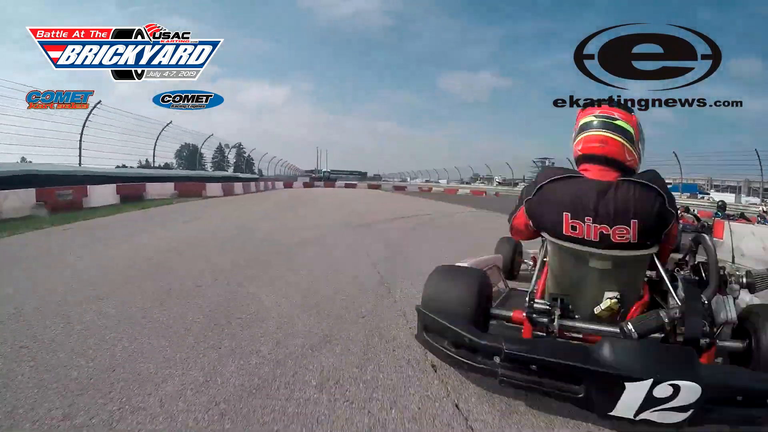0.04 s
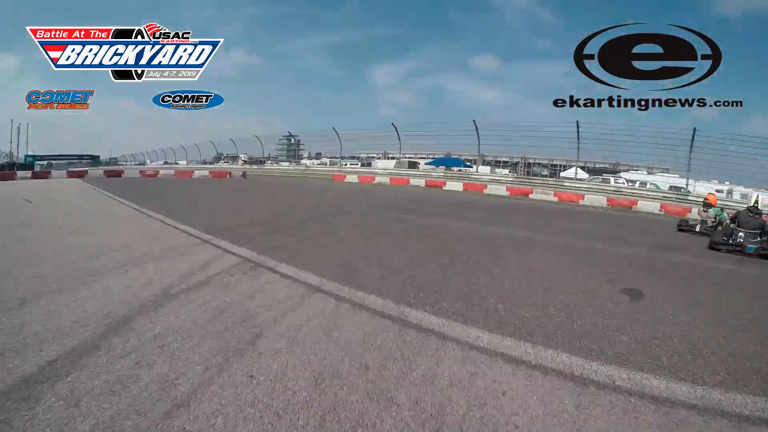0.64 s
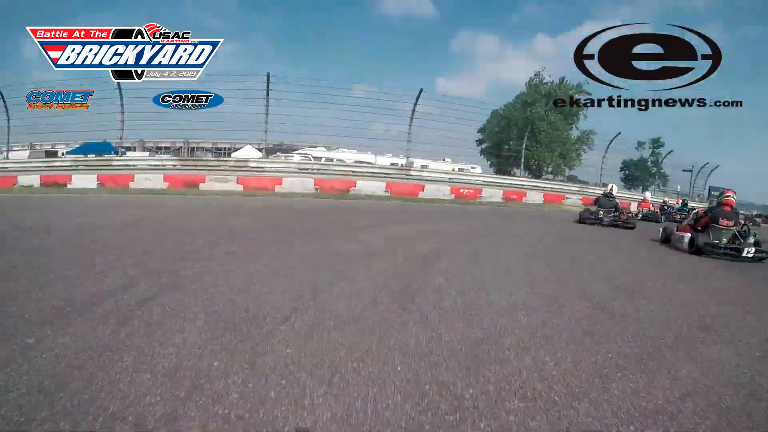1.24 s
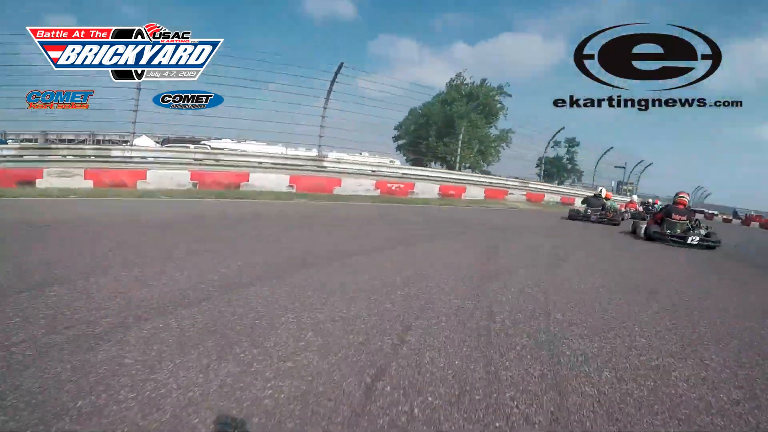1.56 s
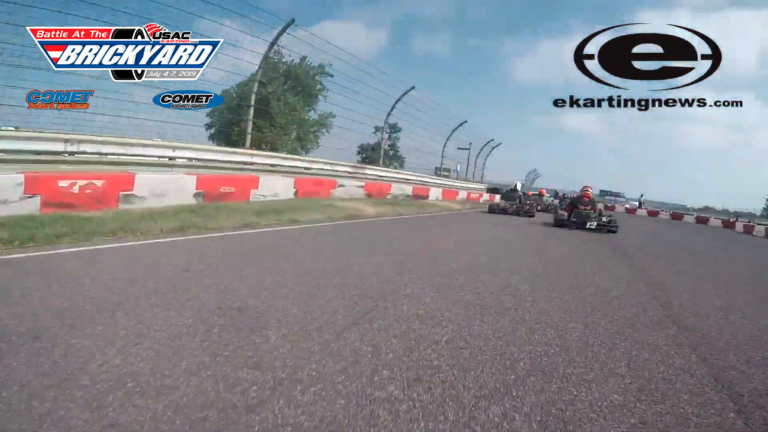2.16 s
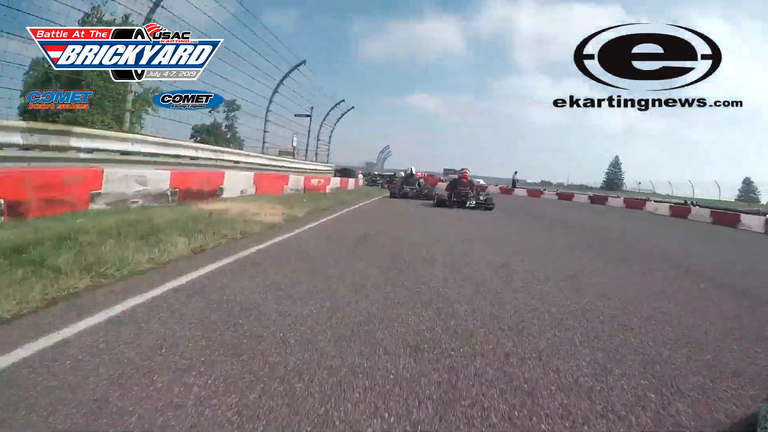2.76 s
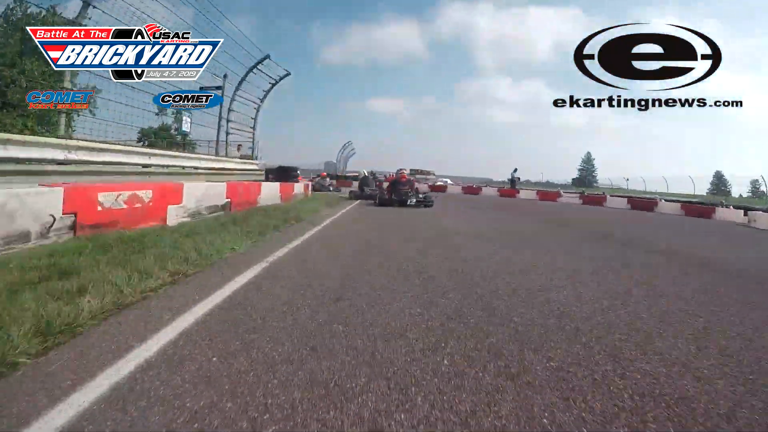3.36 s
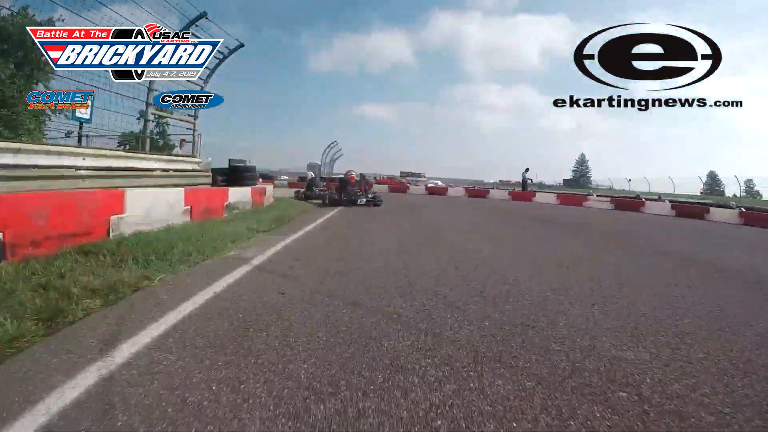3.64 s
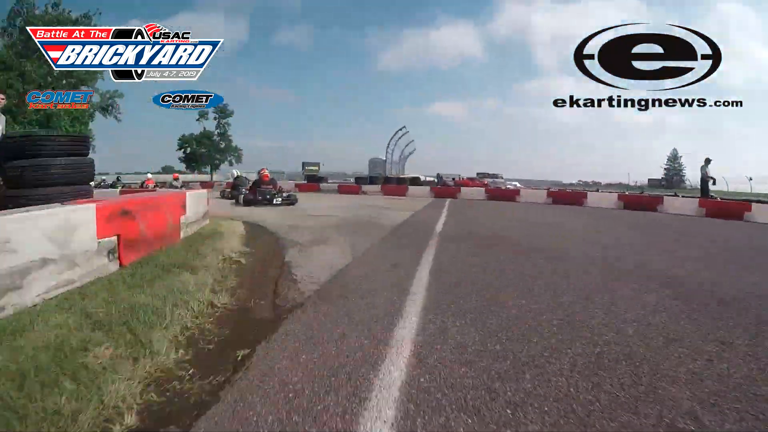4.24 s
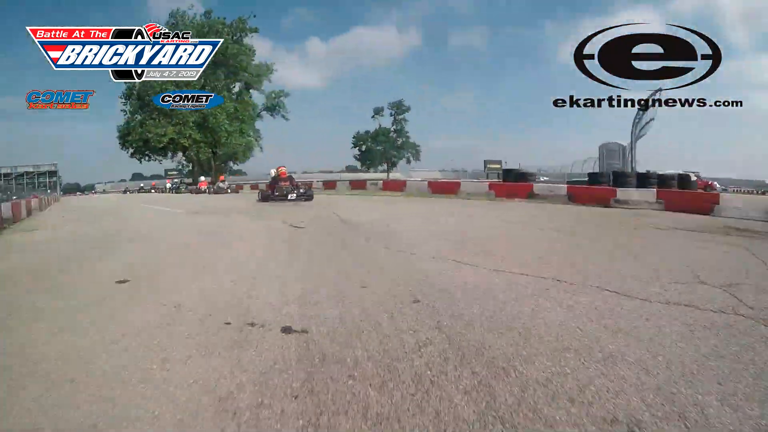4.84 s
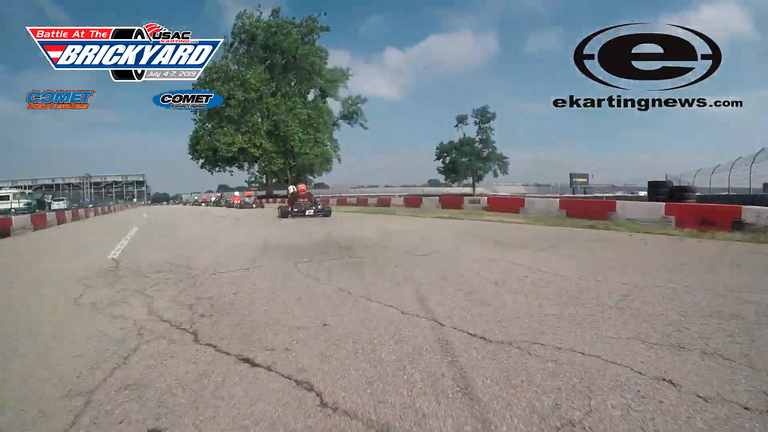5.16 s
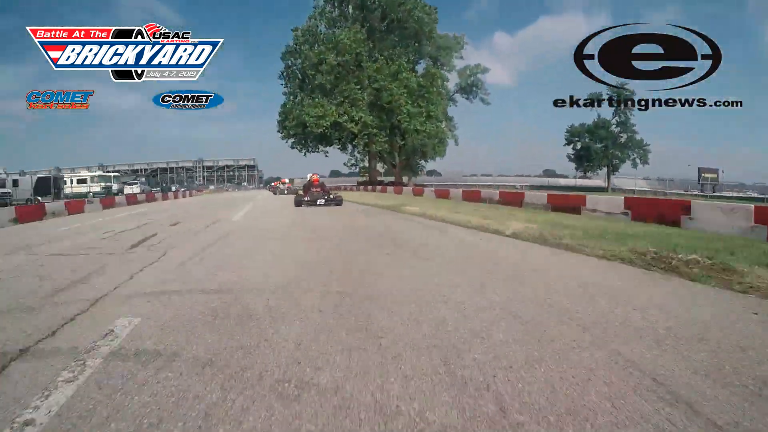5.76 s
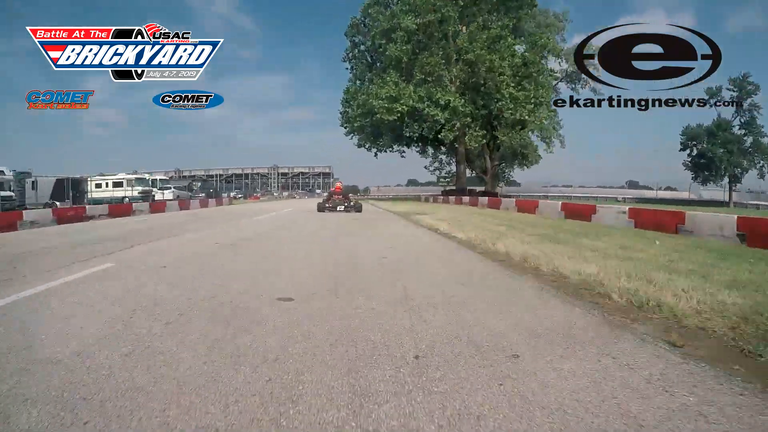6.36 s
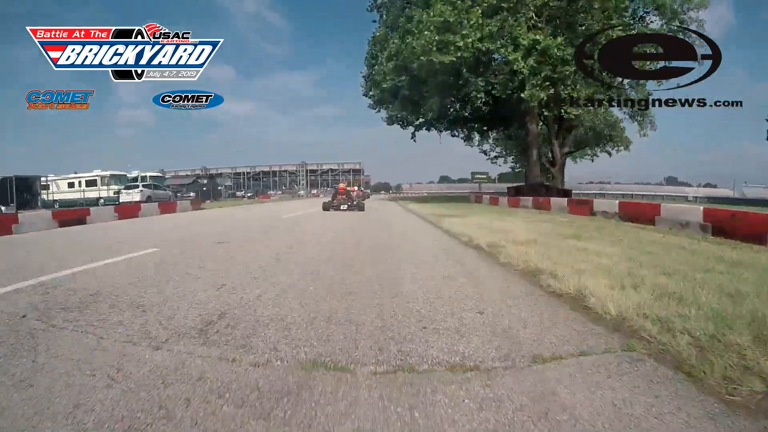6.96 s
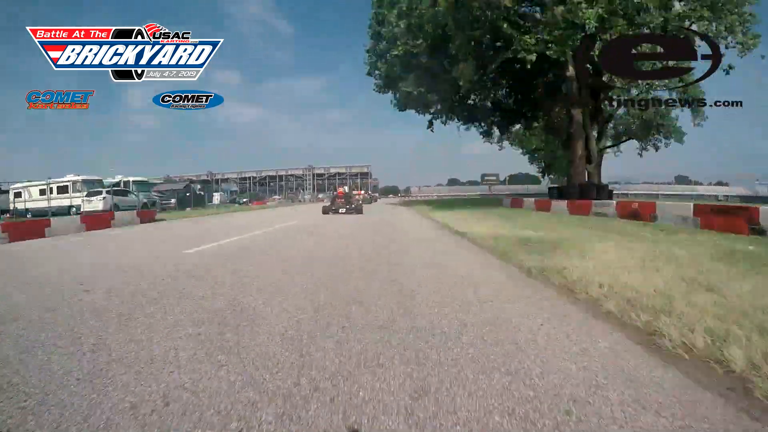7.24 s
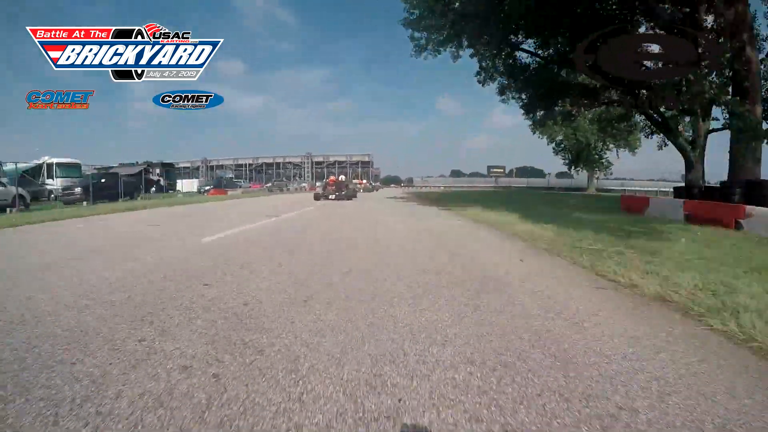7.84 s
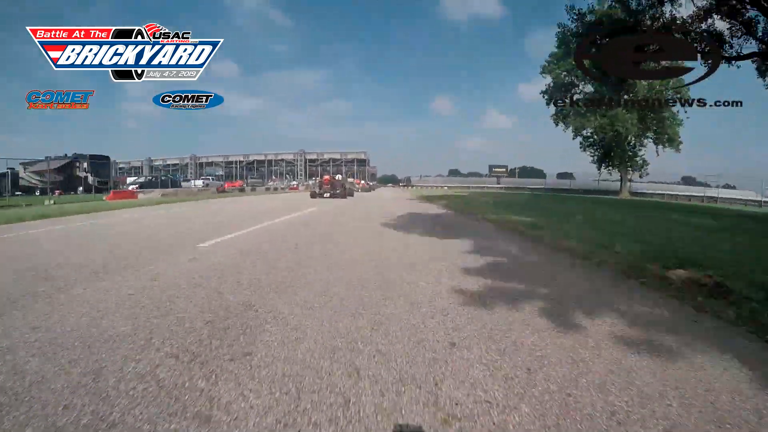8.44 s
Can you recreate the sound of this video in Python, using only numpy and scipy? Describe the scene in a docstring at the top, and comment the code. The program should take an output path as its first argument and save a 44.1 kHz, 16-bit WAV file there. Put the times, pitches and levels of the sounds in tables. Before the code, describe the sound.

The close, hollow rattle of a camera housing runs throughout as a go-kart races over asphalt. Beneath it the small engine dips, catches and drones with a growl, while the exhausts of two nearby karts puff faintly in the first half. A sharp double clatter marks a joint in the surface, after which the tyre roar turns duller. The revs then rise steadily amid knocks, dull thuds and tiny stone ticks.

```python
"""A four-stroke racing kart engine, heard from inside a small camera housing bolted to the kart's nose.
It coasts into a corner, picks up on its slipping clutch, then pulls away, its firings making the frame
drone and growl. Engine shake and asphalt rattle the housing over a bed of tyre roar and air hiss.
Bumps thud, grit ticks, both axles bang over a seam, and the exhausts of two nearby karts puff faintly."""
import sys
import numpy as np
from scipy import signal
from scipy.fft import rfft, irfft, next_fast_len
from scipy.io import wavfile
from scipy.ndimage import uniform_filter1d

SR = 44100
rng = np.random.default_rng(int(sys.argv[2]) if len(sys.argv) > 2 else 0)


def file_out(sig):
    """Save sig as 16-bit WAV at sys.argv[1]."""
    # one column per channel
    cols = np.atleast_2d(sig).T
    # limit, then scale
    lim = np.clip(cols, -1, 1)
    pcm = np.round(lim * 32767).astype(np.int16)
    wavfile.write(sys.argv[1], SR, pcm)


N = 384111


def from_db(db):
    return 10 ** (np.asarray(db) / 20)


def unit_rms(x):
    return x / np.sqrt(np.mean(x ** 2) + 1e-20)


def automation(rows):
    """One curve per column after the time column, with a value at every sample."""
    times, *columns = np.transpose(rows)
    return [np.interp(np.arange(N) / SR, times, column) for column in columns]


def equalise(x, spectrum):
    """Shapes a sound with an EQ curve that rolls off steeply beyond its ends."""
    size = next_fast_len(N + 8192)
    octave = np.log2(np.maximum(np.arange(size // 2 + 1) * SR / size, 1))
    hz, db = np.transpose(spectrum)
    octaves_outside = np.maximum(np.log2(hz[0]) - octave, 0) + np.maximum(octave - np.log2(hz[-1]), 0)
    gain = from_db(np.interp(octave, np.log2(hz), db) - 16.7 * octaves_outside)
    return irfft(rfft(x, size) * gain, size)[:N]


def drift(rate_hz):
    """Smooth random modulation at unit RMS."""
    pole = np.exp(-40 * np.pi * rate_hz / SR)   # runs at one step per 20 samples
    slow = signal.lfilter([1], [1, -2 * pole, pole * pole], rng.standard_normal(N // 20 + 3002))[3000:]
    return np.interp(np.arange(N) / 20, np.arange(len(slow)), unit_rms(slow))


def triggers(hits, gain_db=0):
    """A one-sample kick for each listed hit."""
    kicks = np.zeros(N)
    for at_s, db in hits:
        kicks[int(at_s * SR)] = from_db(db + gain_db)
    return kicks


def die_away(kicks, decay_s):
    """Gives each kick an exponential tail."""
    return signal.lfilter([1], [1, -np.exp(-1 / (decay_s * SR))], kicks + 1e-18)


def levelled(x):
    """Rides the gain to unit level over every eighth of a second; faster detail stays."""
    return x / np.sqrt(np.abs(uniform_filter1d(x * x, SR // 8)) + 1e-12)


# Low-end shake by engine speed:
# (firing rate [Hz], firing order [dB], crank order [dB], third order [dB])
SHAKE_LEVELS = [(22.3, -45, -25, -57), (23.4, -30.5, -26.5, -40.5), (25.4, -29, -43.5, -48.5),
                (27.5, -28.5, -38.5, -42), (28.87, -31, -38.5, -57), (29.1, -29, -34.5, -49),
                (31.2, -31, -31.5, -47)]
def engine_shake(cycle, firing_hz):
    """Firing and crank imbalance shake the chassis; the crank turns twice per firing."""
    speeds, *levels = np.transpose(sorted(SHAKE_LEVELS))
    firing_db, crank_db, third_db = [np.interp(firing_hz, speeds, db) for db in levels]
    phase = 2 * np.pi * cycle
    firing = from_db(firing_db - 1.5 * drift(1)) * np.cos(phase)
    crank = from_db(crank_db + 1.5 * drift(1.4)) * np.sin(2 * phase)
    return firing + crank + from_db(third_db) * np.cos(3 * phase)


def engine_orders(cycle, firing_hz, orders, spectrum, tilt_db=0):
    """Harmonics of the firing rate swell as they sweep through resonances, wavering in level and timing."""
    wander_cycles = 0.0085
    out = 0
    for order in orders:
        db = np.interp(order * firing_hz, *np.transpose(spectrum))
        db += tilt_db * np.log2(order / np.mean(orders))
        turns = order * (cycle + wander_cycles * drift(7.7)) + rng.random()
        out = out + from_db(db + 2.4 * drift(7)) * np.cos(2 * np.pi * turns)
    return unit_rms(out)


# Drone fader, loudest on the way out of the corner: (time [s], level [dB], tilt [dB/octave])
DRONE_RIDE = [(0, -52, 6), (.2, -44.5, 3), (.5, -50, -1), (.75, -43, -4), (1.5, -46.5, 7), (2.25, -42.5, 5),
              (3.6, -46, 23), (4.6, -46, -10), (5.35, -39, -4), (6.1, -37, -4), (6.85, -39, -4),
              (7.15, -43, 9), (7.65, -40.5, 5), (8.1, -46, 0), (8.71, -41.5, -5)]
# Body resonance of the frame: (frequency [Hz], gain [dB])
DRONE_EQ = [(95, -28), (115, -8), (130, -7), (153, 2.5), (168, 3), (185, 1), (208, -10.5), (240, -25)]
def frame_drone(cycle, firing_hz, waver_db):
    """The frame hums along with engine orders 4 to 8."""
    level_db, tilt_db = automation(DRONE_RIDE)
    return from_db(level_db + waver_db) * engine_orders(cycle, firing_hz, range(4, 9), DRONE_EQ, tilt_db)


# Growl fader: (time [s], level [dB])
GROWL_RIDE = [(0, -54), (.62, -58), (.72, -48), (2.9, -48), (3.6, -53), (4.5, -55.5), (6, -54.5),
              (7.5, -51), (8.71, -49.5)]
# Low-mid colour of the growl: (frequency [Hz], gain [dB])
GROWL_EQ = [(235, -2.5), (270, -8), (295, -0.5), (325, -1.5), (350, -0.5), (380, -10), (430, -8)]
def frame_growl(cycle, firing_hz):
    """Engine orders 9 to 14 make the frame growl."""
    level_db, = automation(GROWL_RIDE)
    return from_db(level_db) * engine_orders(cycle, firing_hz, range(9, 15), GROWL_EQ)


# Coarse asphalt: (centre [s], half length [s], tyre roar boost [dB], heave boost [dB])
ROUGH_PATCHES = [(.22, 0.2, 3, 0), (1.276, .1, 4, 4), (2.785, 0.4, 3.5, 9), (3.814, 0.074, 4.5, 1),
                 (5.508, 0.058, 3.5, 8), (6.164, 0.022, 9.5, 0), (6.372, 0.036, 5, 0),
                 (7.175, 0.13, 2.5, 9.5), (8.6, 0.17, 3, -2)]
def rough_patches():
    """Each coarse patch gives a smooth swell: boost curves in dB for tyre roar and heave."""
    t = np.arange(N) / SR
    return sum(np.outer(boosts_db, np.exp(-((t - centre_s) / half_s) ** 2))
               for centre_s, half_s, *boosts_db in ROUGH_PATCHES)


# Heave fader: (time [s], level [dB])
HEAVE_RIDE = [(.55, -36), (1.0, -36), (2.0, -39.5), (2.4, -42), (3.7, -41.5), (4.35, -34.5), (5.1, -40),
              (6.2, -37), (6.85, -33), (7.45, -46.5), (8.1, -35), (8.71, -37)]
# Sub-bass weight of the heave: (frequency [Hz], gain [dB])
HEAVE_EQ = [(14, -10), (22, -2.5), (38, 8), (60, -8), (90, -16.5), (130, -20.5)]
def chassis_heave(boost_db):
    """The chassis heaves on the asphalt with a deep rumble."""
    level_db, = automation(HEAVE_RIDE)
    return from_db(level_db + boost_db) * levelled(equalise(rng.standard_normal(N), HEAVE_EQ))


# Hollow colour of the frame: (frequency [Hz], gain [dB])
BOOM_EQ = [(90, -29), (125, -16), (150, -17.5), (172, -2.5), (200, 1), (235, -18.5), (290, -27.5)]
def road_boom(waver_db):
    """Road noise booms in the frame, riding 6 dB under the drone."""
    drone_db, _ = automation(DRONE_RIDE)
    return from_db(drone_db + waver_db - 6) * levelled(equalise(rng.standard_normal(N), BOOM_EQ))


# Tyre tone before and after the seam: (frequency [Hz], gain [dB])
SMOOTH_TRACK_EQ = [(200, -3), (260, -2), (340, 0.5), (410, -6.5), (500, -10.5), (680, -6.5), (1000, -3),
                   (2000, -9)]
WORN_TRACK_EQ = [(200, -12.5), (260, 2.5), (340, -2.5), (410, -7.5), (500, -9), (680, -6.5), (1000, -7),
                 (2000, -21)]
def tyre_roar(rattle_swing_db, boost_db):
    """The tyres roar on the asphalt, turning duller on the worn stretch past the seam."""
    worn_from_s = 4.42
    tread = rng.standard_normal(N) * from_db(3.66 * drift(32))
    smooth = levelled(equalise(tread, SMOOTH_TRACK_EQ))
    worn = levelled(equalise(tread, WORN_TRACK_EQ))
    surface = np.where(np.arange(N) / SR < worn_from_s, smooth, worn)
    return from_db(-46.5 + 0.51 * rattle_swing_db + boost_db) * surface


# Airy top end: (frequency [Hz], gain [dB])
HISS_EQ = [(3000, 8), (6000, 2.5), (9000, -3.5), (11000, -7), (15500, -10)]
def air_hiss(rattle_swing_db):
    """Passing air gives a fluttering hiss that rises and falls with the rattle."""
    air = rng.standard_normal(N) * from_db(3.9 * drift(60))
    return from_db(-68.5 + 0.63 * rattle_swing_db) * unit_rms(equalise(air, HISS_EQ))


# How strongly each firing pulses in the rattle: (time [s], strength [dB])
FIRING_KICK_RIDE = [(0, -19), (.62, -9), (.64, -26.5), (2.3, -3), (3.3, -6), (4.4, -10), (4.5, -3),
                    (4.9, -2.5), (5.2, -10.5), (7, 0.5), (7.3, -3), (8, -3), (8.71, -4)]
def firing_kicks(cycle, uneven_db, jitter_s):
    """One kick for each power stroke, never quite alike in strength or timing."""
    kick_db, = automation(FIRING_KICK_RIDE)
    ignition = .535   # share of the engine cycle
    strokes = np.flatnonzero(np.diff(np.floor(cycle - ignition)))
    strength, lateness = rng.standard_normal((len(strokes), 2)).T
    onsets = np.clip(strokes + (lateness * jitter_s * SR).astype(int), 0, N - 1)
    kicks = np.zeros(N)
    kicks[onsets] = from_db(kick_db[strokes] + uneven_db * np.clip(strength, -2, 2))
    return kicks


def chatter(taps_per_s, spread_db):
    """Loose contacts strike at uneven moments: clicks, their buzzing tails and a noise bed."""
    strikes = rng.random(N) < taps_per_s / SR
    taps = strikes * from_db(spread_db * np.clip(rng.standard_normal(N), -2, 2))
    buzz = np.sqrt(die_away(taps ** 2, decay_s=0.0018)) * rng.standard_normal(N)
    clicks = taps * rng.choice([-1, 1], N)
    return unit_rms(unit_rms(clicks) + unit_rms(buzz) + from_db(-0.5) * rng.standard_normal(N))


def lull(kicks, lead_s, depth_db):
    """Ducking gain: the housing lifts off its mount and falls quiet just before it strikes."""
    ahead = die_away(np.sign(kicks)[::-1], decay_s=lead_s)[::-1]
    return from_db(depth_db * np.minimum(ahead, 1))


# Boxy resonances of the housing: (frequency [Hz], bandwidth [Hz], gain [dB])
HOUSING_MODES = [(620, 163, -28.5), (779.4, 92, -7.5), (1159, 119, 0.5), (1243, 135.6, 3.5),
                 (1333, 119, -2.5), (1380, 97, -16), (1888, 290, -12), (2358, 134, 1.5), (2457, 152, -5.5),
                 (2684, 174, -7), (2970, 213, -6), (3107, 110, -11.5), (3764, 610, -22.5), (4180, 260, -40),
                 (4070, 170, -50), (5065, 185, -22.5), (5386, 360, -23), (6280, 780, -38),
                 (7210, 104, -34.5), (8360, 1800, -52)]
def housing_ring(force, hardness_db, wander_db):
    """A force rings the housing; the contact point wanders, and hard contacts favour the upper modes."""
    out = np.zeros(N)
    for hz, width_hz, db in HOUSING_MODES:
        band = signal.butter(2, [hz - width_hz / 2, hz + width_hz / 2], "band", fs=SR, output="sos")
        upper_share = np.clip(np.log2(hz / 1350), 0, 1)
        gain = from_db(db + upper_share * hardness_db + wander_db * drift(30.6))
        out += signal.sosfilt(band, force) * gain
    return out * np.sqrt(SR / 2 / 520)   # make-up gain: the main modes pass only a slice of the noise


# Rattle loudness, ducking just after the seam bang and then recovering:
# (time [s], level [dB], contact hardness [dB])
RATTLE_RIDE = [(0, -41, -1.5), (.35, -42, 0), (.62, -44.5, -1), (.64, -36.5, 0.5), (.95, -37, -1),
               (1.4, -40, 0.5), (2.5, -37, -2.5), (3.6, -37.5, -2.5), (4.42, -38, -3.5), (4.45, -45.5, -2),
               (5.0, -39, -2.5), (5.8, -37, 0), (6.95, -35, -2), (7.1, -38.5, -1), (8.05, -35.5, -2),
               (8.71, -37, -2)]
# Hard knocks of the housing in its mount: (time [s], force [dB])
KNOCKS = [(0.636, -28), (0.846, -26), (2.5314, -21.5), (2.954, -23.5), (3.064, -25.5), (3.921, -25.5),
          (4.033, -26), (5.07, -27), (5.379, -30), (5.804, -29), (6.066, -29), (6.289, -28), (6.396, -26.5),
          (6.624, -26), (6.699, -30), (7.267, -34), (7.716, -25.5), (7.852, -25.5), (7.918, -28),
          (8.052, -28), (8.085, -24), (8.12, -25.5), (8.153, -31), (8.446, -25.5), (8.543, -25)]
def housing_rattle(cycle):
    """Each firing throws the housing at its mount: lull, smack, settling chatter. Knocks add accents."""
    level_db, hardness_db = automation(RATTLE_RIDE)
    kicks = firing_kicks(cycle, uneven_db=1.4, jitter_s=.0004)
    knocks = triggers(KNOCKS)
    unrest = np.sqrt(die_away(kicks ** 2, decay_s=0.019) + 0.27)
    settling = unrest * chatter(taps_per_s=380, spread_db=2.0) * lull(kicks, lead_s=0.0045, depth_db=-3.5)
    smack = np.sqrt(die_away(kicks ** 2, decay_s=0.0039)) * rng.standard_normal(N)
    rattle = levelled(smack + settling) * from_db(level_db) * lull(knocks, lead_s=0.011, depth_db=-4.5)
    slam = die_away(knocks, decay_s=0.0031) * rng.standard_normal(N)
    return housing_ring(rattle + slam, hardness_db, wander_db=2.0)


def exhaust(speed, ride, spectrum, puff_s, uneven_db, sizzle_db):
    """Each opening of the exhaust valve lets out a short sharp puff, with a sizzle in between."""
    firing_hz, = automation(speed)
    level_db, = automation(ride)
    in_earshot = np.arange(N) / SR >= speed[0][0]
    fires = np.diff(np.floor(np.cumsum(firing_hz * in_earshot) / SR), prepend=0)
    strength = from_db(uneven_db * np.clip(rng.standard_normal(N), -1, 1))
    openings = die_away(fires * strength, decay_s=.0006)
    flow = unit_rms(die_away(openings, puff_s)) + from_db(sizzle_db + 3.3 * drift(80))
    return from_db(level_db) * unit_rms(equalise(flow * rng.standard_normal(N), spectrum))


# Revs of the kart being passed: (time [s], firing rate [Hz])
PASSED_REVS = [(0, 32), (.06, 30.2), (.36, 30.3), (1.3, 31)]
# Its fade-out: (time [s], level [dB])
PASSED_RIDE = [(0, -50.5), (.13, -50.5), (.3, -57.5), (.38, -62.5), (.6, -69.5), (1.3, -71), (1.6, -100)]
# Its thin exhaust tone: (frequency [Hz], gain [dB])
PASSED_EQ = [(2500, -11), (4200, 3), (6500, -1.5), (8000, -6), (9200, -1.5), (11000, -7.5), (13000, -11),
             (15500, -14)]
def passed_kart():
    """The exhaust of a kart being passed spits and fades away."""
    return exhaust(PASSED_REVS, PASSED_RIDE, PASSED_EQ, puff_s=0.0038, uneven_db=3.0, sizzle_db=-12.5)


# Bumps in the track: (time [s], relative level [dB])
BUMPS = [(0.704, -25.5), (1.291, -34), (1.654, -29), (2.862, -30), (2.925, -30), (4.422, -35), (6.268, -26),
         (6.948, -28.5), (7.155, -28), (7.74, -38), (8.25, -32), (8.522, -35)]
# Dull body of a thud: (frequency [Hz], gain [dB])
THUD_EQ = [(130, -6), (190, 8.5), (290, -2), (400, -4), (600, -8), (900, -10.5), (1500, -30)]
def chassis_thuds():
    """With no springs, each bump goes straight into the frame as a short dull blow."""
    envelope = die_away(triggers(BUMPS, gain_db=14.0), decay_s=0.012)
    return equalise(envelope * rng.standard_normal(N), THUD_EQ)


# Stone hits: (time [s], relative level [dB])
GRIT_HITS = [(1.291, -49), (2.8594, -38), (3.8267, -48), (6.271, -34), (6.7935, -36), (7.673, -37),
             (8.6288, -33)]
# Crisp edge of a tick: (frequency [Hz], gain [dB])
GRIT_EQ = [(2000, -2), (6000, -6), (9500, -0.5), (12000, -7), (15500, 1)]
def grit_ticks():
    """Tiny stones flick the housing with single dry ticks."""
    clicks = triggers(GRIT_HITS, gain_db=6.5)
    tails = 0.56 * die_away(clicks, decay_s=0.00067) * rng.standard_normal(N)
    return equalise(clicks + tails, GRIT_EQ)


# Revs of the chasing kart: (time [s], firing rate [Hz])
CHASER_REVS = [(1.3, 34.7), (2.2, 36.94), (3.3, 37.44), (4.4, 35.75)]
# Its swell and fade: (time [s], level [dB])
CHASER_RIDE = [(1.3, -79), (1.8, -71.5), (2.9, -65.5), (3.4, -67), (4.3, -78.5), (4.6, -100)]
# Its exhaust tone, all treble: (frequency [Hz], gain [dB])
CHASER_EQ = [(6000, -8.5), (8000, -14), (9000, -6.5), (9400, -10), (10000, -4), (10900, -12), (11450, -10),
             (12000, -13), (13100, -13), (14000, -17), (15500, -24)]
def chasing_kart():
    """The exhaust of a kart close behind ticks faintly."""
    return exhaust(CHASER_REVS, CHASER_RIDE, CHASER_EQ, puff_s=0.0015, uneven_db=2.5, sizzle_db=-9.5)


# Front, then rear wheels hit the seam: (time [s], level [dB], hold [s], tilt [dB/octave])
SEAM_HITS = [(4.384, -23.5, .012, 3), (4.418, -27, .011, -1)]
# Clatter of the bodywork: (frequency [Hz], gain [dB])
CLATTER_EQ = [(400, -19.5), (900, 2), (1300, 0.5), (1750, -3), (2100, -3), (2400, 10), (2750, -1),
              (3500, -15), (4050, -9), (4600, -20), (5600, -21), (6500, -29), (9000, -40), (15000, -55)]
def seam_bangs():
    """Each axle slams over the joint and sets the bodywork clattering."""
    t, out = np.arange(N) / SR, np.zeros(N)
    for at_s, level_db, hold_s, tilt_db in SEAM_HITS:
        spectrum = [(hz, db + tilt_db * np.log2(hz / 2000)) for hz, db in CLATTER_EQ]
        clatter = unit_rms(equalise(rng.standard_normal(N), spectrum))
        attack = np.exp(np.minimum(t - at_s, 0) / 0.0016)
        release = np.exp(-np.maximum(t - at_s - hold_s, 0) / 0.0046)
        out += from_db(level_db) * clatter * attack * release
    return out


# Revs of the kart we ride on: (time [s], firing rate [Hz])
REVS = [(0, 23.59), (0.2, 23.69), (0.6, 21.89), (0.72, 26.37), (1.1, 26.57), (1.5, 27.56), (2.3, 26.74),
        (3.5, 26.75), (4, 26.09), (5.6, 25.99), (6.4, 26.89), (8.3, 30.5), (8.71, 31.29)]
def scene():
    """Mono mix of engine, road and rattle, with the nearby karts and the hits from the track."""
    firing_hz, = automation(REVS)
    cycle = np.cumsum(firing_hz) / SR
    rattle_db, _ = automation(RATTLE_RIDE)
    rattle_swing_db = rattle_db - rattle_db.mean()   # tyres and air follow a share of it
    waver_db = 1.65 * drift(14)   # drone and boom waver together
    roar_boost_db, heave_boost_db = rough_patches()
    mix = engine_shake(cycle, firing_hz)
    mix += frame_drone(cycle, firing_hz, waver_db) + frame_growl(cycle, firing_hz)
    mix += chassis_heave(heave_boost_db) + road_boom(waver_db)
    mix += tyre_roar(rattle_swing_db, roar_boost_db) + air_hiss(rattle_swing_db)
    mix += housing_rattle(cycle)
    mix += passed_kart() + chasing_kart()
    mix += chassis_thuds() + seam_bangs() + grit_ticks()
    return mix[None]


def record(dry):
    """Soft clipping rounds the peaks, then a steep low-pass cuts the very top."""
    cutoff_hz = 15800
    lowpass = signal.ellip(10, .2, 80, cutoff_hz, fs=SR, output="sos")
    return signal.sosfilt(lowpass, .3 * np.tanh(dry / 0.29))


dry = scene()
out = record(dry)
file_out(out)
```